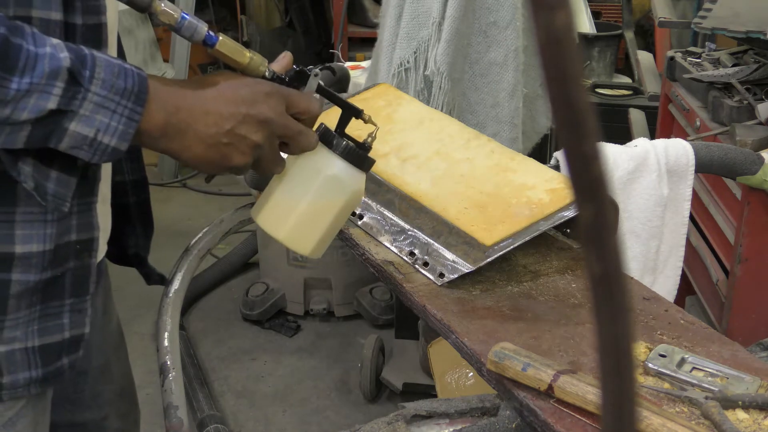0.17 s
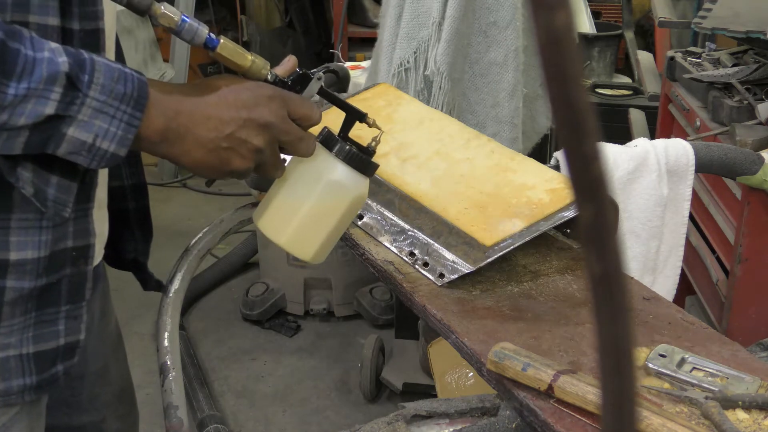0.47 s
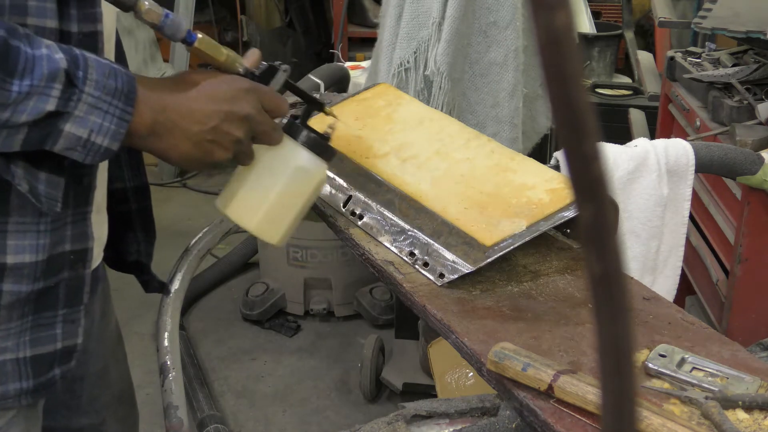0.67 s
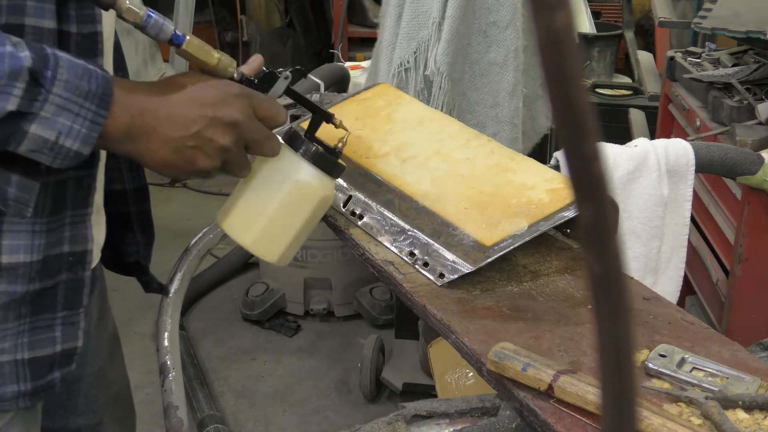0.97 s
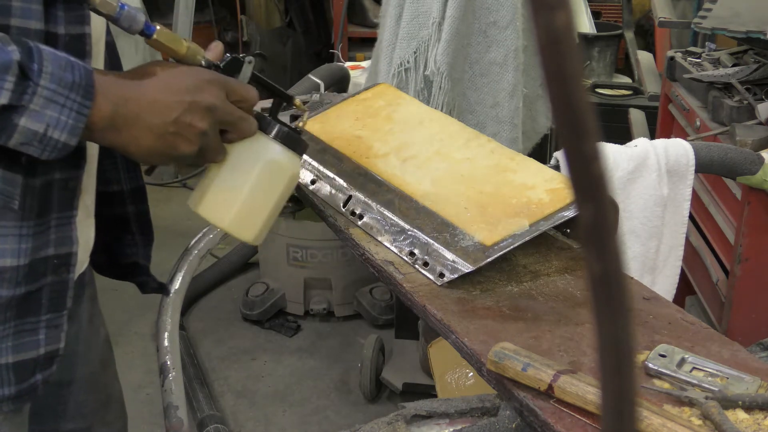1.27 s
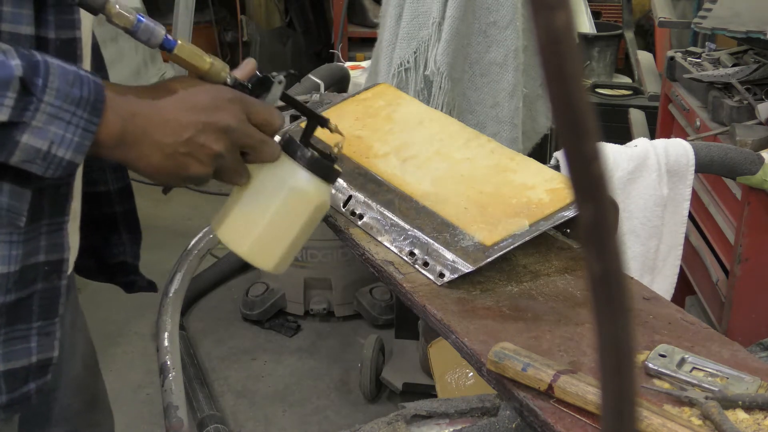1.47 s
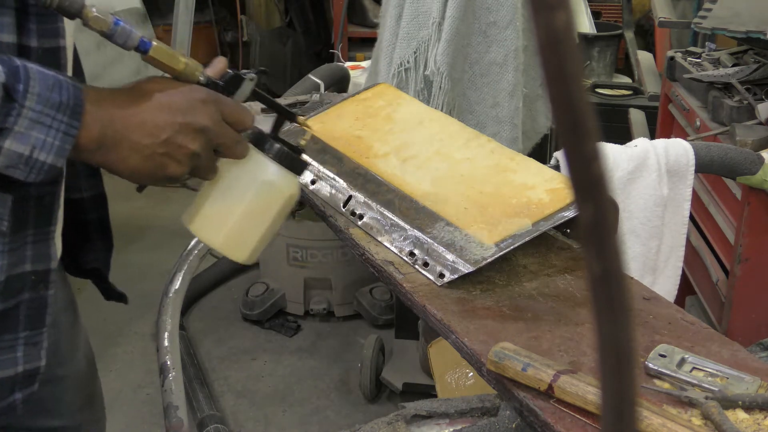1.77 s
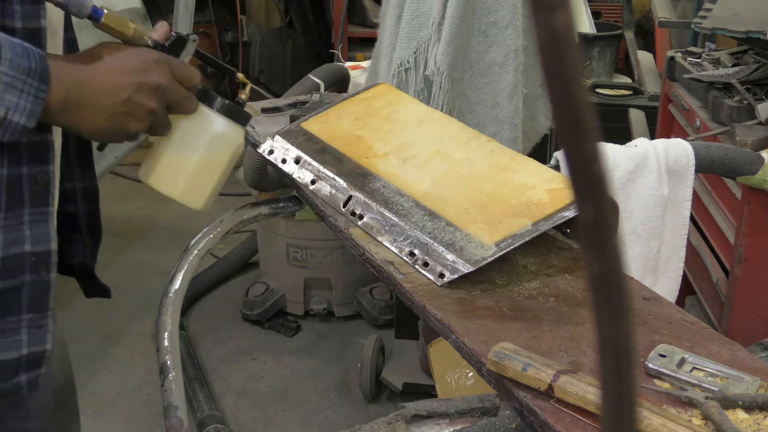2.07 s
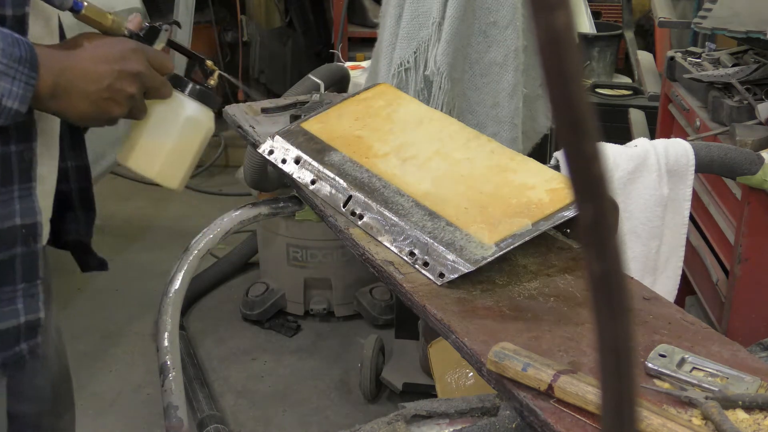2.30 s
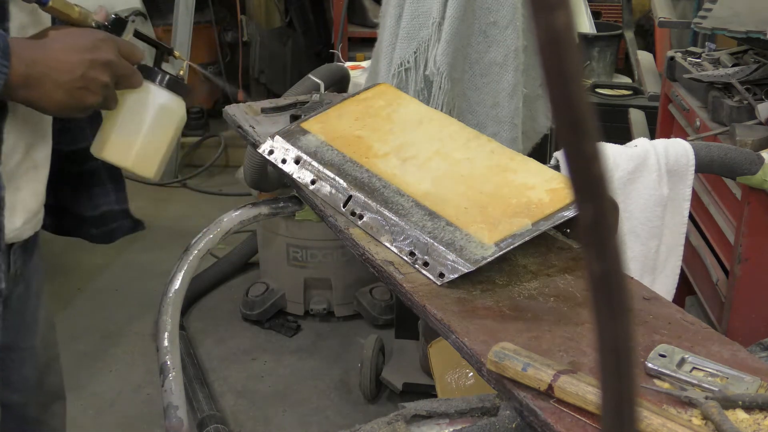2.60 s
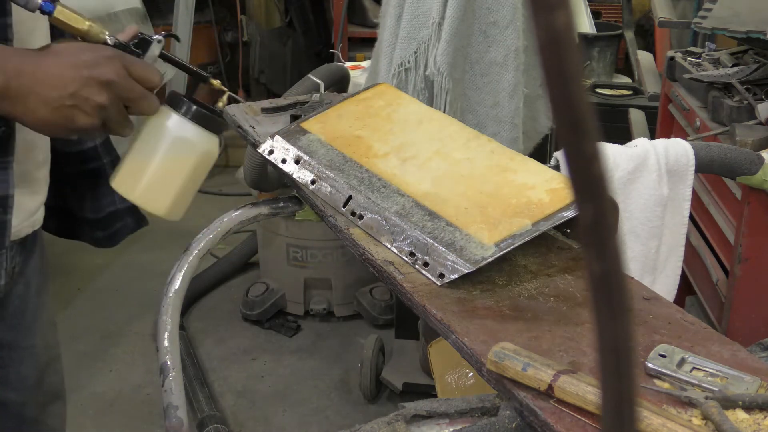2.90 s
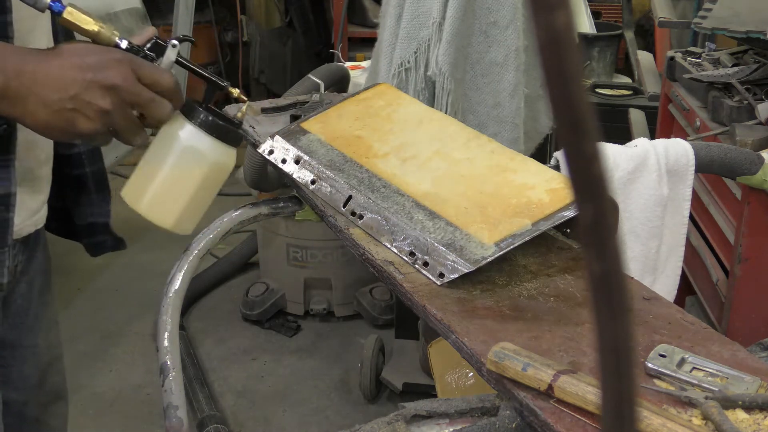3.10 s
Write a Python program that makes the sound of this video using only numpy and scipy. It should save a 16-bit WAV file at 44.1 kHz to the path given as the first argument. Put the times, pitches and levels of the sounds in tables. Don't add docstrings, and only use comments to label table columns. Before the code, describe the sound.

A spray gun in a small workshop: tiny gun and hose clicks over faint hum and ventilation until 0.2 s, then a valve thump and bright, dense air hiss to about 1.0 s, bleeding off quickly. Quiet gap with room ring and ticks near 1.2 and 1.34 s. At 1.45 s a stronger blast surges, sweeping foam and metal edges with slight tonal shifts and low rumble, stopping near 2.98 s and fading.

```python
import sys
import numpy as np
from scipy import signal
from scipy.fft import rfft, irfft, next_fast_len
from scipy.io import wavfile
from scipy.ndimage import uniform_filter1d

SR = 44100
rng = np.random.default_rng(int(sys.argv[2]) if len(sys.argv) > 2 else 0)


def log_audio(samples):
    frames = np.atleast_2d(samples).T
    limited = np.clip(frames, -1, 1)
    pcm = np.round(limited * 32767).astype(np.int16)
    wavfile.write(sys.argv[1], SR, pcm)


def how_loud(loudness_db):
    steps = np.asarray(loudness_db, float) / 20
    return 10 ** steps


N = 143325


def evened(x):
    return x / np.sqrt(np.mean(x ** 2) + 1e-20)


def read(points, hz):
    f, value = np.transpose(points)
    return np.interp(np.log(hz + 1), np.log(f + 1), value)


def octaves_above(hz, corner_hz):
    return np.maximum(np.log2((hz + 1) / corner_hz), 0)


def slow(size, shape=N):
    return evened(uniform_filter1d(uniform_filter1d(rng.standard_normal(shape), size), size))


def drifting_patches(grid, bins, frames):
    return evened(uniform_filter1d(uniform_filter1d(grid, size=bins, axis=0), size=frames, axis=1))


def stereo_pair(left, other, same):
    return np.array([left, same * left + np.sqrt(1 - same ** 2) * other])


def noise(colour_db, same, patchy_db):
    frames, hz = N // 256 + 5, np.fft.rfftfreq(1024, 1 / SR)[:, None]
    a, b, c, d, grid = rng.standard_normal((frames, 513, 5)).T
    z = stereo_pair(a + 1j * b, c + 1j * d, np.clip(read(same, hz), 0, 1))
    t_s = np.arange(frames) * 256 / SR
    z *= how_loud(colour_db(hz, t_s) + patchy_db * drifting_patches(grid, 9, 14))
    return evened(signal.istft(z, nperseg=1024, noverlap=768)[1][:, :N])


# open_s, shut_s, surge_db, bleed_db, bleed_s
TRIGGER_PULLS = [
    (0.209, 0.992, -1, -16, 0.086),
    (1.446, 2.976, 4.5, 0.5, 0.018),
]
RISE_S, SHUT_S, SURGE_S, THUMP_S = 0.015, 0.015, 0.012, 0.01
SETTLE_DB, SETTLE_S = 2.5, 0.052
BLEED_SAG_DB_PER_S, BLEED_END_S = -68, 0.02


def valve():
    t = np.arange(N) / SR
    flow, leak, thump = np.zeros(N), np.zeros(N), np.zeros(N)
    for open_s, shut_s, surge_db, bleed_db, bleed_s in TRIGGER_PULLS:
        since_open, since_shut = np.maximum(t - open_s, 0), np.maximum(t - shut_s, 0)
        rise = np.minimum(since_open / RISE_S, 1) ** 3
        late = np.maximum(since_open - RISE_S * 1.22, 0)
        main = np.exp(-since_shut / SHUT_S)
        pressure_db = surge_db * np.exp(-late / SURGE_S) + SETTLE_DB * np.exp(-late / SETTLE_S)
        flow += rise * how_loud(pressure_db) * main
        bleed_end = np.exp(-np.maximum(since_shut - bleed_s, 0) / BLEED_END_S)
        leak += (1 - main) * how_loud(bleed_db + BLEED_SAG_DB_PER_S * since_shut) * bleed_end
        thump += rise * np.exp(-late / THUMP_S)
    return flow, leak, thump


# time_s, hiss_db, share_at_camera_0_to_1, wash_db
AIM = [(.2, -15.5, 0.04, -49), (.35, -13.5, 0.18, -51), (.74, -13.5, 0.5, -50.5), (.78, -11.5, 0.2, -52.5),
       (.99, -10.5, 0.3, -38), (1.47, -14, 0.6, -50.5), (1.7, -14.5, 0.7, -47), (1.85, -14, 1, -47.5),
       (1.95, -15, 0.5, -44.5), (2.08, -14.5, 0.5, -44.5), (2.2, -14.5, .6, -47.5),
       (2.34, -15.5, 0.7, -42.5), (2.4, -14, 0.85, -42.5), (2.72, -14.5, 0.76, -42), (2.8, -14, 1, -37),
       (2.9, -14.5, 0.7, -54), (3.0, -13, 0.5, -39)]
# freq_hz, density_db
ALONG = [(700, -22), (860, -24.5), (970, -15), (3300, -6), (5500, -5), (7700, -4.5), (8800, 4), (15600, -7)]
# freq_hz, density_db
ACROSS = [(700, -21.5), (850, -20), (970, -12.5), (3700, -4.5), (5500, -5.5), (8200, -2), (11500, -0.5),
          (15600, -4.5)]
# mid_s, length_s, freq_hz, width_hz, lift_db
EDGES = [
    (.775, .03, 5500, 5000, 2.5),
    (2.52, .15, 5400, 800, 5.5),
    (2.55, .15, 2100, 400, 2.5),
    (2.94, .08, 2100, 400, 3.5),
    (.58, .12, 13500, 2000, 1.5),
    (2.67, .06, 3700, 350, 3.5),
    (2.4, .05, 11800, 900, 2.5),
]


def jet_colour_db(hz, t_s):
    aim_s, _, share, _ = np.transpose(AIM)
    across = np.clip(np.interp(t_s, aim_s, share), 0, 1)
    lift = 0
    for mid_s, length_s, freq_hz, width_hz, lift_db in EDGES:
        lift = lift + lift_db * np.exp(-((t_s - mid_s) / length_s) ** 2 - ((hz - freq_hz) / width_hz) ** 2)
    low_cut = 30 * np.maximum(np.log2(650 / (hz + 1)), 0)
    return read(ALONG, hz) * (1 - across) + read(ACROSS, hz) * across - low_cut + lift


def aim_level_db(column):
    columns = np.transpose(AIM)
    return np.interp(np.arange(N) / SR, columns[0], columns[column])


# freq_hz, likeness_0_to_1
SAME_JET = [(100, 0.93), (700, 1), (1200, 0.95), (3000, 1), (5000, 0.59), (7000, 0.89), (10000, 0.94),
            (15000, 0.85)]
SPUTTER_DB, FLICKER_DB = 0.5, 0.68


def hiss():
    level_db = aim_level_db(1) + SPUTTER_DB * slow(size=30) + FLICKER_DB * slow(size=500)
    return noise(jet_colour_db, SAME_JET, 1.5) * how_loud(level_db)


# freq_hz, density_db
WASH = [(65, -48), (115, -17), (160, -10), (198, -24.5), (236, -3.5), (440, -7), (495, 5.5), (570, -13.5),
        (673, -2.5), (900, -40), (1170, -34), (1980, -120)]


def wash():
    def colour_db(hz, t_s):
        return read(WASH, hz) - 40 * octaves_above(hz, 800)
    return noise(colour_db, SAME_JET, 1.2) * how_loud(aim_level_db(3) + 0.5 * slow(size=900))


# freq_hz, likeness_0_to_1
SAME_FAR = [(60, 0.64), (240, 0.85), (950, 0.78), (3770, 0.21), (15000, 1)]
BLEED_DULL_DB_PER_OCT = 2.5


def bleed():
    def colour_db(hz, t_s):
        return jet_colour_db(hz, t_s) - BLEED_DULL_DB_PER_OCT * octaves_above(hz, 6000)
    return noise(colour_db, SAME_FAR, 1.54) * how_loud(aim_level_db(1))


def valve_thump():
    b, a = signal.butter(2, [90, 350], "band", fs=SR)
    return how_loud(-39.5) * evened(signal.lfilter(b, a, rng.standard_normal(N)))


def jet():
    flow, leak, thump = valve()
    return flow * (hiss() + wash()) + leak * bleed() + thump * valve_thump()


# start_s, level_db, centre_hz, width_hz, t60_s
TICKS = [(0, -51, 4000, 5000, 0.18), (0.0243, -49, 5200, 3000, 0.052), (.028, -66, 7000, 303, 0.19),
         (0.044, -64.5, 4800, 490, 0.072), (.073, -58.5, 10000, 4020, .01), (0.089, -60, 1300, 300, .12),
         (.09, -60, 2200, 400, .12), (.091, -60.5, 7500, 4940, 0.017), (0.099, -53, 9500, 8010, 0.032),
         (.099, -55.5, 10300, 895, .04), (0.101, -56.5, 1200, 250, .15),
         (0.1322, -44.5, 6000, 11200, 0.013), (0.1318, -51, 3550, 705, .05), (.137, -57, 7500, 6000, 0.025),
         (.13, -62.5, 1100, 203, 0.14), (0.15, -55, 1850, 350, 0.084), (.156, -58.5, 2700, 797, .08),
         (0.167, -61, 1450, 395, 0.074), (.2255, -31, 1700, 1600, .02), (.226, -39, 380, 340, .04),
         (1.462, -35, 300, 200, .05), (1.204, -58.5, 9000, 9000, 0.027), (1.338, -48, 7500, 8500, 0.013),
         (1.339, -44, 1410, 2000, 0.025)]
SNAP = 1.5


def ticks():
    out, t = np.zeros(N), np.arange(6000) / SR
    for start_s, level_db, centre_hz, width_hz, t60_s in TICKS:
        band_hz = [max(centre_hz - width_hz / 2, 200), min(centre_hz + width_hz / 2, 20000)]
        drive = rng.standard_normal(len(t))
        drive[0] = SNAP * np.sqrt(SR / width_hz)
        band = signal.butter(3, band_hz, "band", fs=SR, output="sos")
        burst = evened(signal.sosfilt(band, drive))
        at = max(round(start_s * SR), 0)
        out[at:at + len(t)] += how_loud(level_db - 60 * t / t60_s) * burst
    return out


# freq_hz, t60_s
SHOP_DECAY = [(200, 0.66), (1500, 0.44), (4000, 0.39), (9000, 0.23), (15000, 0.2)]
SHOP_DB, NEAR_DB = -8, -13


def tail():
    taps = np.zeros((2, SR // 2))
    slots = np.arange(300, SR // 2 - 20, 20)
    at = slots + rng.integers(0, 20, (2, len(slots)))
    np.put_along_axis(taps, at, rng.choice([-1., 1.], (2, len(slots))), 1)
    hz, t, z = signal.stft(taps, SR, nperseg=256)
    z = stereo_pair(z[0], z[1], np.clip(read(SAME_FAR, hz), 0, 1)[:, None])
    decay = how_loud(-60 * t / read(SHOP_DECAY, hz)[:, None])
    out = signal.istft(z * decay, SR, nperseg=256)[1]
    out *= how_loud(SHOP_DB) / np.linalg.norm(out[0])
    out[:, rng.integers(40, 900, 7)] += how_loud(NEAR_DB) * rng.choice([-1., 1.], 7) / np.sqrt(7)
    return out


SWEEP_S = 0.12


def shop(x, count=8):
    place = np.arange(N) / SR / SWEEP_S
    out = np.zeros((2, N))
    for k in range(count):
        away = abs((place - k + count / 2) % count - count / 2)
        part = x * np.cos(np.pi / 2 * np.minimum(away, 1))
        out += signal.fftconvolve(part, tail(), axes=1)[:, :N]
    return out


# freq_hz, level_db
HUM = [(172, -65), (194.5, -61), (239.5, -66), (359, -67), (480, -68), (1080, -75), (1320, -75)]


def hum():
    t, out = np.arange(N) / SR, np.zeros(N)
    for freq_hz, level_db in HUM:
        level = how_loud(level_db + 4 * np.clip(slow(size=1200), -2.5, 1))
        out += np.sqrt(2) * level * np.sin(2 * np.pi * (freq_hz * t + 0.07 * slow(size=2500)))
    return out


# time_s, level_db
GUSTS = [(0, -65), (.25, -67), (.3, -81.5), (.42, -70), (.5, -85), (.7, -81), (.8, -55), (.95, -62),
         (1.15, -61), (1.22, -70.5), (1.43, -60), (1.56, -83.5), (1.66, -80), (1.72, -57), (1.85, -76),
         (1.95, -62), (2.1, -70), (2.17, -87), (2.27, -80), (2.33, -59), (2.44, -63.5), (2.5, -81),
         (2.58, -64.5), (2.66, -76.5), (2.75, -55.5), (2.85, -67.5), (2.92, -59.5), (3.25, -68)]
# freq_hz, likeness_0_to_1
SAME_LOW = [(30, 1), (200, 0.4)]


def draught():
    def colour_db(hz, t_s):
        return -14 * octaves_above(hz, 100)
    gust_db = np.interp(np.arange(N) / SR, *np.transpose(GUSTS))
    return noise(colour_db, SAME_LOW, 1.3) * how_loud(gust_db + 4 * slow(size=1500))


# freq_hz, density_db
VENTILATION = [(59, -44), (110, -14.5), (195, -9), (277, -15.5), (441, -16.5), (467, -18.5), (573, -21.5),
               (1500, -31), (1950, -58), (3300, -120)]
# freq_hz, density_db
MIC_HISS = [(120, -59.5), (590, -32), (1000, -15.5), (1160, -4.5), (1600, -9.5), (1900, -8.5), (2540, -9.5),
            (5500, -18.5), (7300, -22), (9000, -18.5), (12500, -17.5), (15600, -26.5)]


def room_tone():
    air = how_loud(-58) * noise(lambda hz, t_s: read(VENTILATION, hz), SAME_FAR, 1.0)
    mic = how_loud(-58) * noise(lambda hz, t_s: read(MIC_HISS, hz), SAME_FAR, 0.68)
    return air + mic + draught() + hum()


def scene():
    near = jet() + ticks()
    return near + shop(near) + room_tone()


# freq_hz, threshold_spreads
LOST = [(700, 2.6), (1200, 1.1), (1800, 1.5), (2600, 1.2), (4200, .1), (5600, .9), (9200, .2),
        (11000, -.35), (15000, -.3)]
LOUD_DB, SURGE_LOUD_DB = -34, -22.5


def thinned(side, mid):
    hz, t, z = signal.stft(side, SR, nperseg=2048, noverlap=1536)
    patch = drifting_patches(rng.standard_normal(z.T.shape).T, 7, 4)
    power = np.interp(t * SR, np.arange(N), uniform_filter1d(mid ** 2, size=1500))
    quiet, below_surge = power < how_loud(2 * LOUD_DB), power < how_loud(2 * SURGE_LOUD_DB)
    kept = (patch > read(LOST, hz)[:, None]) & below_surge | quiet
    return signal.istft(z * kept, nperseg=2048, noverlap=1536)[1][:N]


# start_s, length_s, above_hz
DROPOUTS = [
    (.203, .008, 4800),
    (1.4415, .006, 900),
]


def dropouts(x):
    t = np.arange(N) / SR
    for start_s, length_s, above_hz in DROPOUTS:
        shut = uniform_filter1d(1. * (t > start_s) * (t < start_s + length_s), size=50)
        high = signal.butter(4, above_hz, "high", fs=SR, output="sos")
        x = x - shut * signal.sosfiltfilt(high, x)
    return x


# freq_hz, gain_db
CAPSULE = [(6200, -0.5), (6800, 0.5), (7500, -1), (11900, 0.5), (12500, -0.5), (13250, 4), (14100, 0.5),
           (15100, 3)]
# freq_hz, gain_db
PORTS = [(100, 0.5), (400, 0), (750, -11.5), (1200, -0.5), (2200, 0.5), (4500, 0.5), (5600, -1),
         (6400, -7.5), (8500, -18.5), (9600, 4.5)]
EDGE_HZ = 15750


def microphone(x):
    size = next_fast_len(N + 4096)
    hz = np.fft.rfftfreq(size, 1 / SR)
    colour = how_loud(read(CAPSULE, hz)) / (1 + np.exp(np.minimum((hz - EDGE_HZ) / 9, 50)))
    mid = irfft(rfft((x[0] + x[1]) / 2, size) * colour, size)[:N]
    side = irfft(rfft((x[0] - x[1]) / 2, size) * colour * how_loud(read(PORTS, hz)), size)[:N]
    side = thinned(side, mid)
    return np.array([mid + side, mid - side])


def band_limit(x):
    return signal.sosfilt(signal.butter(12, 16400, fs=SR, output="sos"), x)


# time_s, gain_db
GAIN = [(0, -1.5), (.229, -1), (.238, -7), (0.27, -11), (1.001, -14.5), (1.22, -12), (1.45, -9), (1.5, -11),
        (2.99, -12), (3.081, -17), (3.17, -25), (3.25, -24)]
NOTCH_HZ, NOTCH_WIDTH_HZ, NOTCH_DEPTH = 600, 110, 0.8


def record(dry):
    b, a = signal.iirpeak(NOTCH_HZ, NOTCH_HZ / NOTCH_WIDTH_HZ, SR)
    x = dry - NOTCH_DEPTH * signal.lfilter(b, a, dry)
    x = x * how_loud(np.interp(np.arange(N) / SR, *np.transpose(GAIN)))
    mix = microphone(dropouts(x))
    return band_limit(mix)


dry = scene()
out = record(dry)
log_audio(out)
```